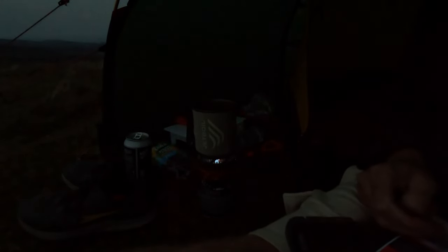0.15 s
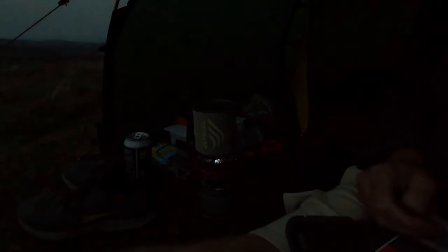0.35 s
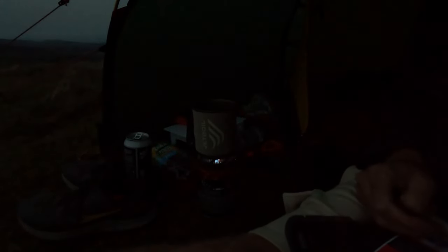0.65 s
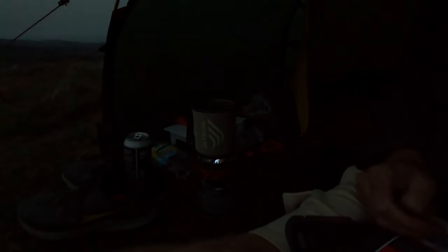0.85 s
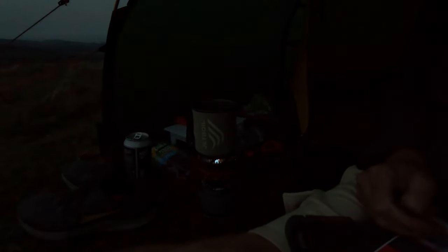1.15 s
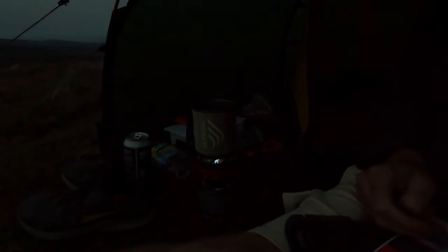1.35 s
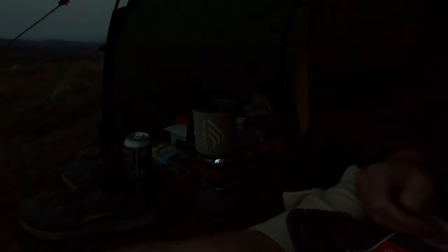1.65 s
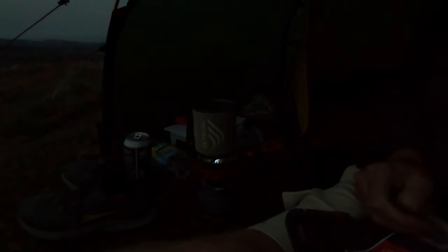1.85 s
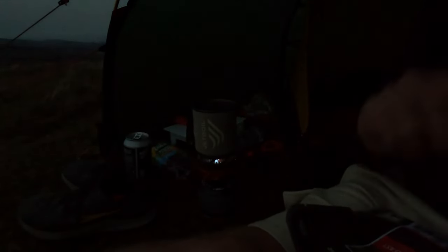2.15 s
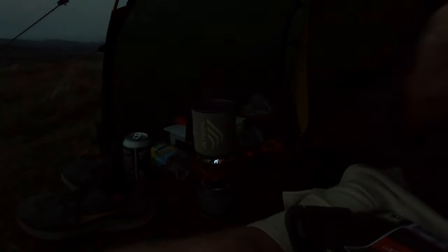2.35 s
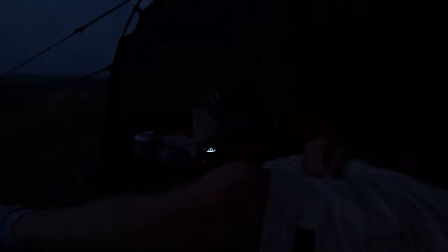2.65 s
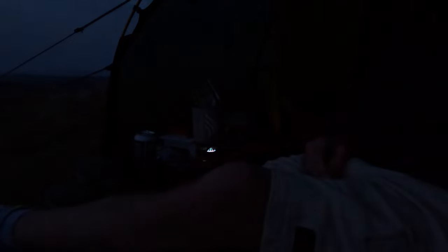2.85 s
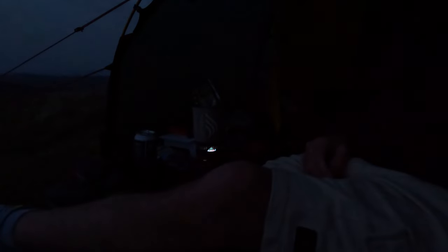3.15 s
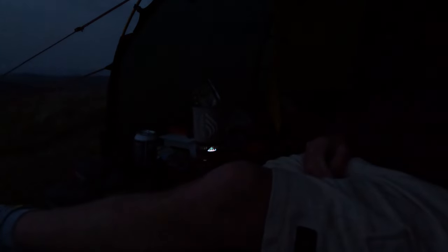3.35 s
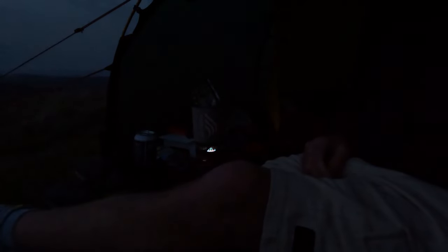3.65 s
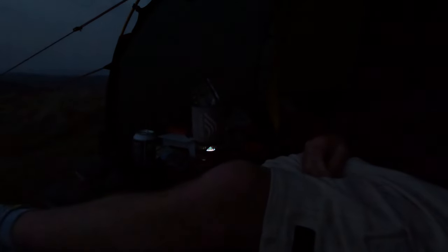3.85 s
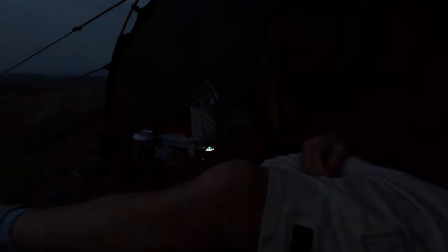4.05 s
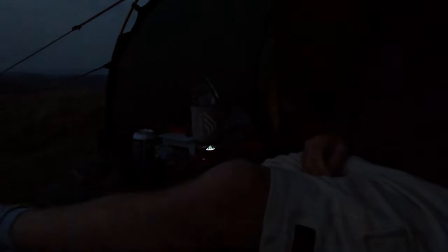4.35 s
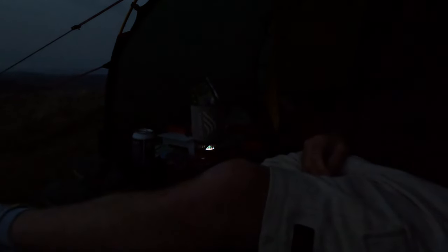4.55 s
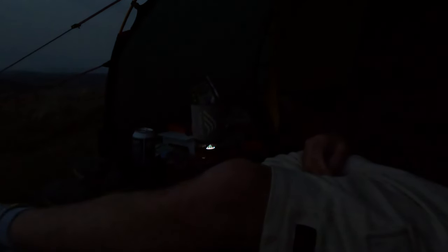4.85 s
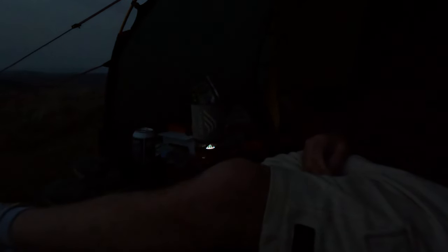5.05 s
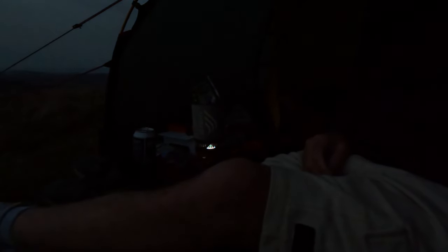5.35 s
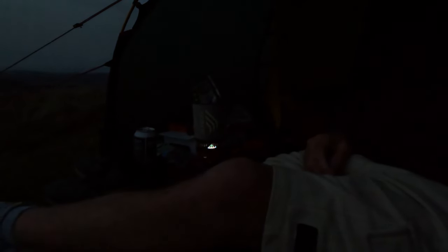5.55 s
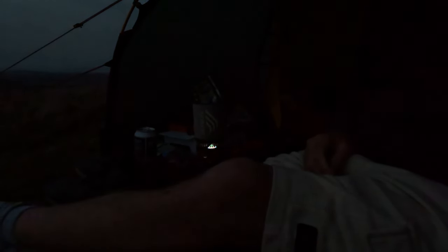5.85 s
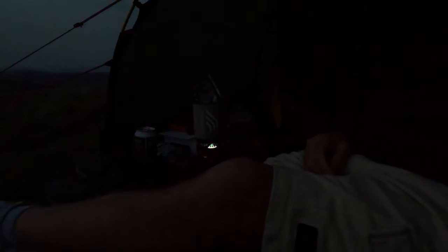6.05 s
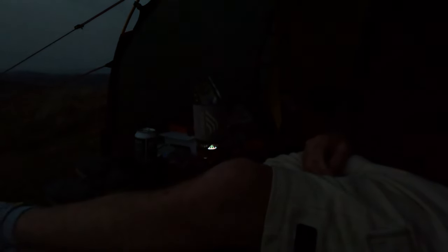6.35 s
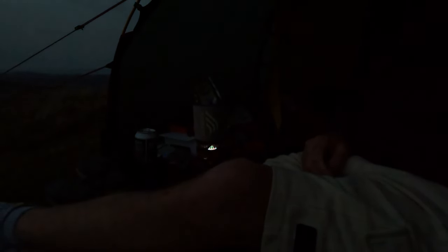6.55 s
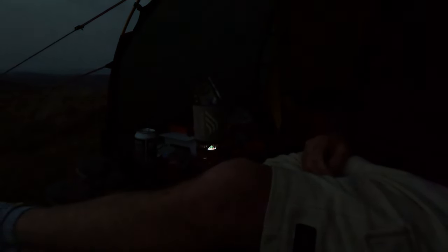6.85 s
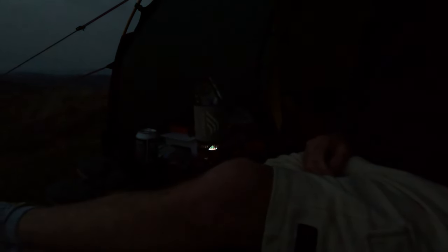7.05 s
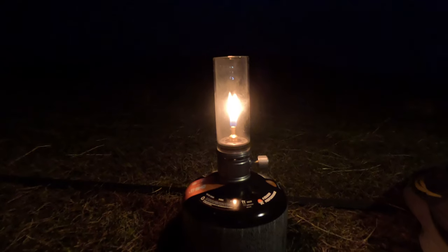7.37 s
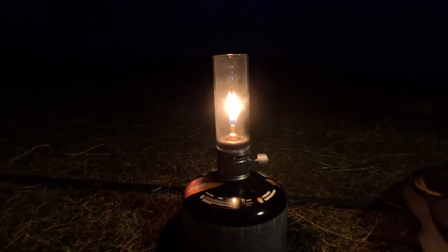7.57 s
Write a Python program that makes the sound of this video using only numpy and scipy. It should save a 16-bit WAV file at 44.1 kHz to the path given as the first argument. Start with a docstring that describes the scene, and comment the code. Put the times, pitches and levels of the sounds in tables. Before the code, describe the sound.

Inside a tent opening, a nearby gas burner hisses and roars steadily under a pot, with almost no echo. After an abrupt cut, the stove is heard turned low: a faint spitting hiss and soft flame flutter, dotted with little pops from heating water and occasional dry crackles. Gentle gusts bump the microphone, then everything gives way to a brief, dull swell of wind.

```python
"""Gas stove roaring under a pot in a tent porch: jet hiss and flame rumble through burner resonances.
It stops dead; a low flame follows, with steam bubbles popping in the pot, dry ticks and a breeze
buffeting the microphone. The last scene is only a soft, swelling outdoor wind rumble."""
import sys
import numpy as np
from scipy import signal
from scipy.fft import rfft, irfft
from scipy.io import wavfile

SR = 44100
rng = np.random.default_rng(int(sys.argv[2]) if len(sys.argv) > 2 else 0)


def materialize(psi):
    """Save the field psi as 16-bit PCM at rate SR to the path in sys.argv[1].

    A 1-D psi becomes a single channel; in a 2-D psi each row is a channel.
    """
    bounded = np.clip(np.atleast_2d(psi).T, -1, 1)
    quanta = np.round(bounded * 32767).astype(np.int16)
    wavfile.write(sys.argv[1], SR, quanta)


N = 339999
T = np.arange(N) / SR
FREQS = np.maximum(np.fft.rfftfreq(N, 1 / SR), 1)
FULL_END_S, SIMMER_START_S, SIMMER_FULL_S, SIMMER_END_S = 2.556, 2.689, 2.81, 7.257

# stereo width of low flame and breeze: f/Hz, side minus mid/dB
SIMMER_WIDTH = [(50, -15), (200, -25.5), (1000, -17.5), (2300, -14.5), (5000, -11.5), (8000, -10)]


def full_flame():
    """Jet hiss and flame rumble flutter through the same resonances; the hiss grows as the burner warms."""
    # jet spectrum: f/Hz, level/dB
    jet = [(900, -31), (1600, -12.5), (2000, -11.5), (2250, 2), (3100, 0), (4100, 0.5), (5200, -3.5),
           (6200, -4.5), (6950, -8), (7400, -12), (8600, -20.5), (10200, -20), (12300, -28.5),
           (14300, -41.5)]
    # flame spectrum: f/Hz, level/dB
    flame = [(20, -15), (55, -9.5), (100, -5.5), (180, 0.5), (260, -0.5), (370, -3), (460, -9),
             (550, -16.5), (680, -7.5), (900, -8.5), (1300, -7), (1600, -15), (2100, -14.5), (4000, -43.5)]
    # resonances of burner head and gap under the pot: f/Hz, width/Hz, lift/dB
    modes = [(794, 110, 6), (1220, 73, 0.5), (1746, 150, 1.5), (2480, 190, 1), (2730, 130, 2.5),
             (3470, 70, 2), (3707, 180, 5), (4450, 160, 0), (4704, 240, 5), (5046, 140, 6), (5350, 140, 0),
             (6500, 180, -1), (9940, 380, 2.5)]
    # stereo width: f/Hz, side minus mid/dB
    width = [(50, -14.5), (200, -27), (700, -19), (2000, -17.5), (5000, -18), (8000, -13), (11300, -12.5),
             (12700, -4.5)]
    # left channel lag: f/Hz, phase/rad
    lag = [(400, 0), (1600, .13), (2200, .42), (3500, .6), (4200, 0.55), (6500, 0.31), (9000, .04)]
    # burner slightly to the right: f/Hz, left minus right/dB
    balance = [(200, -.5), (670, -1.5), (2200, -1.3), (7500, -0.6), (11000, 1)]
    jet_db = -34 + .49 * T
    hiss = turbulence(jet, width, modes, over_hz(lag)) * undb(jet_db + .3 * walk(rate_hz=22))
    rumble = turbulence(flame, width, modes, over_hz(lag)) * undb(-38 + .72 * walk(rate_hz=9.9))
    pan = undb(np.outer([.5, -.5], over_hz(balance)))
    return irfft(rfft(hiss + rumble) * pan * tent(echo_gain=.022), N)


def low_flame():
    """A nearly closed jet spits over soft flame flutter; both settle with the gas flow as a thin top grows."""
    # jet spectrum: f/Hz, level/dB
    jet = [(800, -18), (1300, -12.5), (2000, -3.5), (2350, -8.5), (2750, -3.5), (3400, 4.5), (3950, -1),
           (4400, -4.5), (5300, -6), (6100, -10), (6800, -16.5), (7600, -16.5), (9000, -28.5), (13000, -37)]
    # burner resonances: f/Hz, width/Hz, lift/dB
    modes = [(1970, 180, 1), (2580, 130, 4.5), (3220, 100, 3), (3370, 90, -2.5), (3490, 90, 4),
             (4070, 150, 3.5), (4230, 120, -1.5), (5230, 170, 4), (5760, 92, -1.5), (6060, 150, 2.5),
             (7230, 130, 1.5), (10540, 160, 4)]
    # jet hiss above 4.5 kHz: t/s, gain/dB
    treble_gain = [(2.8, -1.5), (3.15, 2), (3.6, -1), (4.3, .2), (5.5, -0.2), (7.25, 4.5)]
    # spectrum of the thin top: f/Hz, level/dB
    top_hiss = [(7000, -11), (9400, -6), (10400, 3.5), (11900, 5.5), (12700, -0.5), (13500, -9),
                (14000, -24)]
    # its stereo width: f/Hz, side minus mid/dB
    top_width = [(9000, -14), (11000, -17), (12700, 1)]
    # flame spectrum: f/Hz, level/dB
    flame = [(60, -11), (110, -13), (160, 1.5), (200, 1.5), (300, -2), (400, -8), (480, -17), (550, -27),
             (650, -18), (780, -6.5), (950, -6), (1200, -15.5), (1500, -19), (2500, -50)]
    age_s = np.maximum(T - SIMMER_FULL_S, 0)
    excess_db = 3.5 * np.exp(-(age_s / .8) ** 2)
    hiss = turbulence(jet, SIMMER_WIDTH, modes) * undb(-60 + excess_db + walk(rate_hz=59))
    treble = irfft(rfft(hiss) / (1 + (4500 / FREQS) ** 8), N)
    hiss += (undb(over_time(treble_gain)) - 1) * treble
    top = turbulence(top_hiss, top_width, modes) * undb(-80.8 + 1.74 * age_s)
    flutter_db = -55.4 + .77 * excess_db + 1.14 * walk(rate_hz=14)
    flutter = turbulence(flame, SIMMER_WIDTH) * undb(flutter_db)
    direct = spread(hiss + flutter) + top
    return irfft(rfft(direct) * tent(echo_gain=.04), N)


def pot(patter_count=130):
    """Steam bubbles leave the base in groups: clear pops amid small flurries, over a random patter."""
    # clear pops, before the tone filter: t/s, peak/dB, sharpness/dB
    pops = [(3.013, -35.5, -26), (3.155, -39.5, -18), (3.363, -40.5, -10), (3.465, -31.5, -12.5),
            (3.647, -41, -25), (3.836, -35.5, -34), (4.502, -35, -24), (4.562, -39, -30),
            (4.61, -37.5, -28), (4.713, -37, -17), (4.861, -41.5, -22), (4.951, -40, -28),
            (4.988, -43, -11), (5.138, -38.5, -27), (5.278, -41.5, -21), (5.343, -41.5, -26),
            (5.367, -37.5, -14), (5.526, -40.5, -13), (5.641, -42.5, -25), (5.678, -39, -30),
            (5.705, -40, -8), (5.836, -41.5, -23), (5.923, -41, -21), (5.971, -38.5, -29),
            (6.047, -27.5, -39), (6.278, -38.5, -17), (6.721, -36.5, -34), (7.113, -33.5, -14),
            (7.187, -28, -31), (7.236, -38.5, -15)]
    # tone of the pops, thin below about 700 Hz and dull above 2.2 kHz: f/Hz, gain/dB
    pop_colour = [(300, -20), (550, -12.5), (660, -3.5), (780, 0), (2200, 1), (2600, -10), (5000, -12)]
    bubbles = np.zeros(N)
    for s, peak_db, sharp_db in pops:
        add(bubbles, s, pop(peak_db, pot_hz(s) * (1 + .023 * rng.standard_normal()), sharp_db))
        for delay, size, pitch in rng.random((5, 3)):
            small_pop = pop(-54 + 7 * size, pot_hz(s) * (.87 + .3 * pitch), sharp_db + 2.5)
            add(bubbles, s + .08 * (delay - .35), small_pop)
    for when, size, pitch, sharp in rng.random((patter_count, 4)):
        s = SIMMER_FULL_S + when * (SIMMER_END_S - SIMMER_FULL_S)
        add(bubbles, s, pop(-53.5 + 9 * size ** 2, pot_hz(s) * (.86 + .3 * pitch), -25 + 18 * sharp))
    return irfft(rfft(bubbles) * undb(over_hz(pop_colour)), N)


def pop(peak_db, hz, sharp_db):
    """A collapsing bubble knocks the pot; a sharper collapse rings the upper modes more."""
    # pot modes: frequency ratio, decay/ms, relative level/dB, share of sharpness
    modes = [(1, 1.09, 7, 0), (1.35, 1.1, -1, 0.95), (2.05, .8, 2, .8)]
    knock = sum(ring(hz * ratio, ms) * undb(db + share * (sharp_db + 10))
                for ratio, ms, db, share in modes)
    return knock * undb(peak_db) / np.abs(knock).max()


def pot_hz(s):
    """First pot mode at time s; it creeps up as the water heats."""
    return 856 + 20 * (s - SIMMER_FULL_S)


def ring(hz, decay_ms):
    """Heavily damped mode: swells for about a cycle, gone after a few."""
    age = T[:1024] * 1000 / decay_ms
    return -age * np.exp(1 - age) * np.sin(2 * np.pi * hz * T[:1024])


def ticks(decay_ms=2.9, edge_ratio=1.22):
    """Small dry crackles: noise bursts about half an octave wide."""
    # ticks: t/s, peak/dB, centre/Hz
    events = [(3.355, -40, 3040), (3.5117, -46, 5600), (3.912, -44.5, 1780), (4.107, -39.5, 3400),
              (4.742, -44.5, 1650), (5.443, -44, 2050), (6.008, -45.5, 1950), (6.381, -44.5, 1950)]
    track = np.zeros(N)
    for s, peak_db, hz in events:
        burst = rng.standard_normal(1024) * np.exp(-T[:1024] * 1000 / decay_ms)
        band = signal.butter(3, [hz / edge_ratio, hz * edge_ratio], "band", fs=SR, output="sos")
        tick = signal.sosfilt(band, burst)
        add(track, s, tick * undb(peak_db) / np.abs(tick).max())
    return track


def breeze():
    """Moving air and a few short gusts buffet the microphone."""
    # breeze strength: t/s, level/dB
    strength = [(2.8, -55), (3.6, -56), (4.8, -54.5), (5.8, -63), (6.7, -54.5), (7.25, -61)]
    # gusts: t/s, level/dB
    gusts = [(3.25, -51), (3.95, -46), (4.135, -45), (4.52, -48), (6.65, -53)]
    # buffet spectrum: f/Hz, level/dB
    buffet = [(10, 10), (30, 4), (55, -3), (80, -13.5), (130, -31), (300, -58.5)]
    gust_gain = sum(undb(db) * bump(s, half_s=.036) for s, db in gusts)
    air = spread(turbulence(buffet, SIMMER_WIDTH))
    return air * (undb(over_time(strength) + 3 * walk(rate_hz=6.6)) + gust_gain)


def wind():
    """Dull wind rumble swells, with one short lull, over a very faint steady hiss."""
    # rumble spectrum: f/Hz, level/dB
    rumble = [(15, -11), (50, 0.5), (130, 2.5), (185, -5.5), (222, -15.5), (258, -37), (450, -50),
              (1000, -80)]
    # air hiss spectrum: f/Hz, level/dB
    hiss = [(300, 4), (1300, -4), (4000, -13), (9000, -20), (14000, -29)]
    # stereo width: f/Hz, side minus mid/dB
    width = [(200, -41), (370, -5), (7000, -5)]
    rumble_db = -55 + 17 * np.maximum(T - SIMMER_END_S, 0) - 9 * bump(7.345, half_s=.022)
    return turbulence(rumble, width) * undb(rumble_db) + turbulence(hiss, width) * undb(-83.5)


def tent(echo_gain, count=14):
    """Frequency response of direct sound plus weak echoes off fabric, ground and gear within 30 ms."""
    impulse = np.zeros(N)
    impulse[0] = 1
    for when, sign in zip(rng.random(count), rng.choice([-1, 1], count)):
        impulse[int((.003 + .027 * when) * SR)] += echo_gain * sign
    return rfft(impulse)


def turbulence(spectrum, width, modes=(), lag_rad=0):
    """Stereo flow noise lifted by resonances; rms 1."""
    lift_db = sum(db / (1 + (2 * (FREQS - hz) / width_hz) ** 2) for hz, width_hz, db in modes)
    mid, side = rfft(rng.standard_normal((2, N))) * undb(over_hz(spectrum) + lift_db)
    side *= undb(over_hz(width))
    left = (mid + side) * np.exp(-1j * lag_rad)
    return unit(irfft(np.array([left, mid - side]), N))


def spread(x, start_s=5.05, full_s=6.8):
    """Open from mono to full stereo width."""
    mid = x.mean(axis=0)
    return mid + ramp(start_s, full_s) * (x - mid)


def walk(rate_hz):
    """Smooth random drift; rms 1."""
    return unit(irfft(rfft(rng.standard_normal(N)) / (1 + (FREQS / rate_hz) ** 4), N))


def over_hz(points):
    hz, value = np.transpose(points)
    return np.interp(np.log(FREQS), np.log(hz), value)


def over_time(points):
    return np.interp(T, *np.transpose(points))


def ramp(start_s, end_s):
    return np.clip((T - start_s) / (end_s - start_s), 0, 1)


def bump(s, half_s):
    return np.exp(-((T - s) / half_s) ** 2)


def add(track, s, sound):
    i = int(np.clip(s * SR, 0, N - len(sound)))
    track[i:i + len(sound)] += sound


def undb(db):
    return 10 ** (np.asarray(db) / 20)


def unit(x):
    return x / np.sqrt(np.mean(x ** 2))


def scene():
    """Three scenes: the roar stops dead, the simmer fades in, the wind follows at once."""
    roar_off = ramp(FULL_END_S - .001, FULL_END_S + .001)
    roar_tail = undb(-22.5) * roar_off * (1 - ramp(FULL_END_S, FULL_END_S + .0228)) ** 2
    wind_on = ramp(SIMMER_END_S - .002, SIMMER_END_S + .0028)
    simmer_gain = ramp(SIMMER_START_S, SIMMER_FULL_S) ** 1.52 * (1 - wind_on)
    roar = full_flame() * (1 - roar_off + roar_tail)
    simmer = (low_flame() + pot() + ticks() + breeze()) * simmer_gain
    return roar + simmer + wind() * wind_on


def record(dry, cutoff_hz=14100):
    """Steep low-pass."""
    return signal.sosfilt(signal.ellip(10, .1, 80, cutoff_hz, fs=SR, output="sos"), dry)


dry = scene()
out = record(dry)
materialize(out)
```